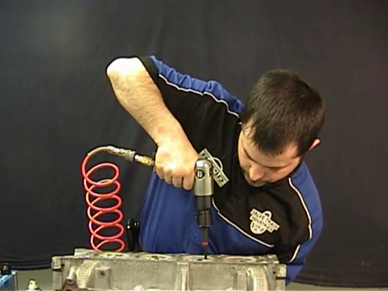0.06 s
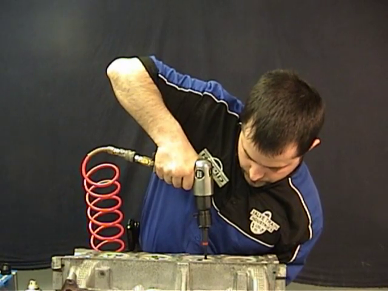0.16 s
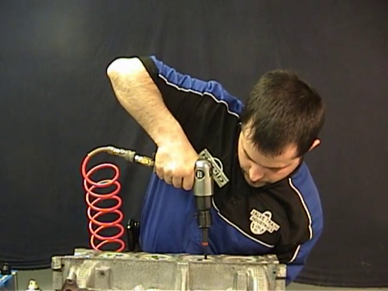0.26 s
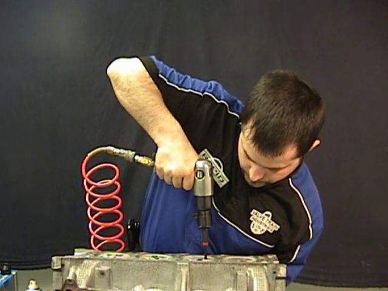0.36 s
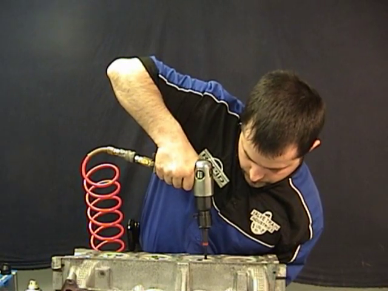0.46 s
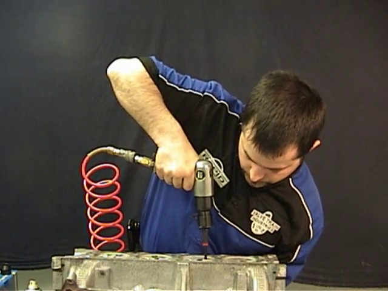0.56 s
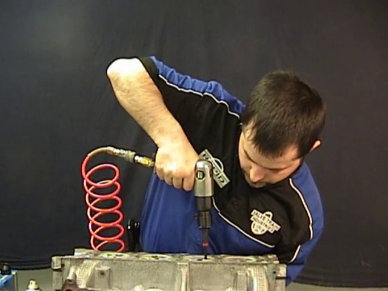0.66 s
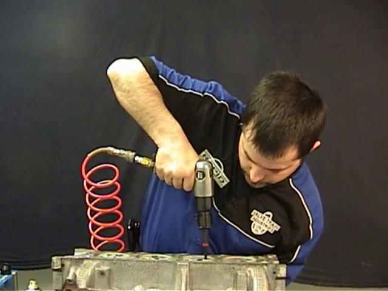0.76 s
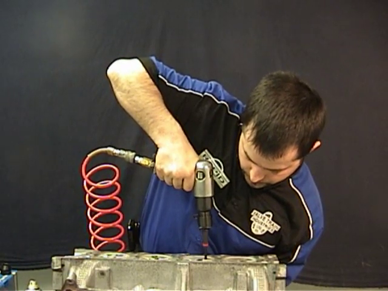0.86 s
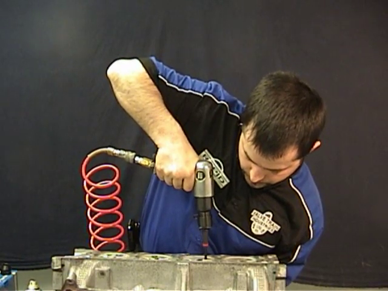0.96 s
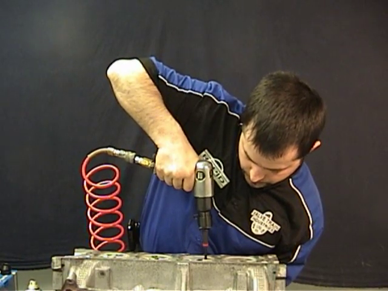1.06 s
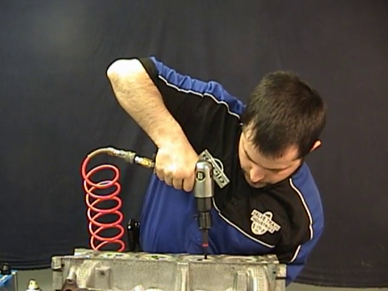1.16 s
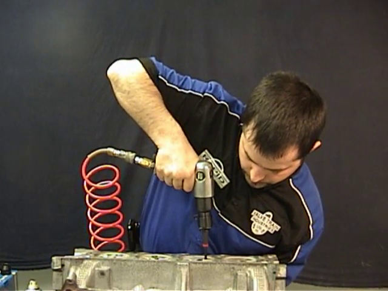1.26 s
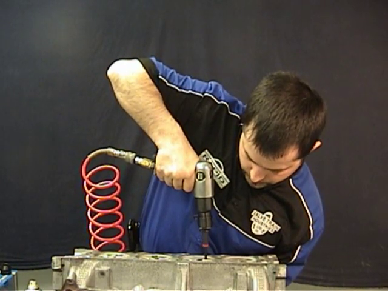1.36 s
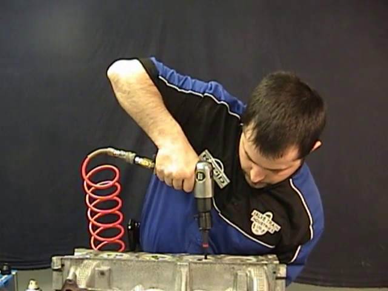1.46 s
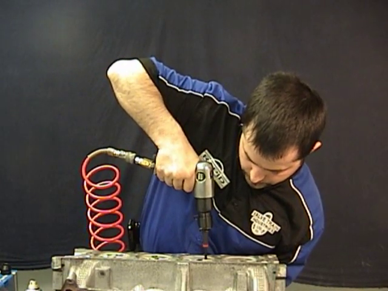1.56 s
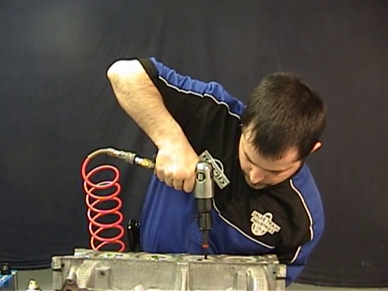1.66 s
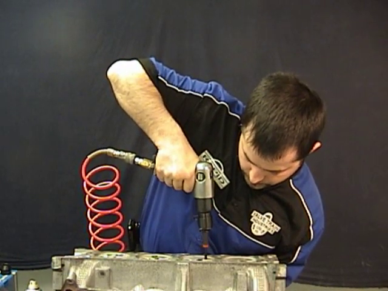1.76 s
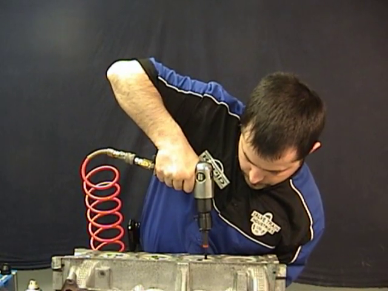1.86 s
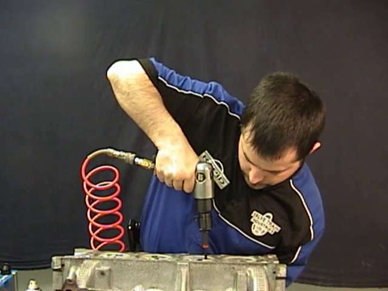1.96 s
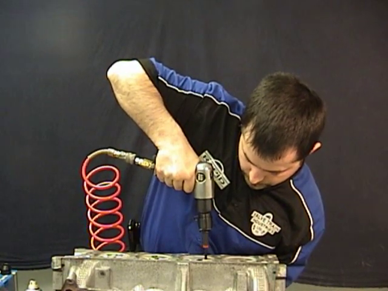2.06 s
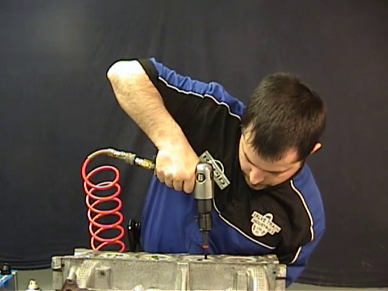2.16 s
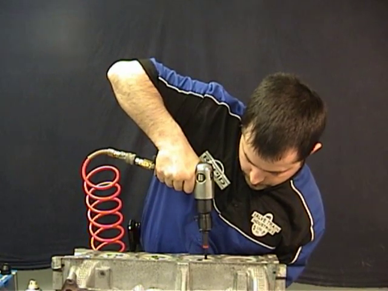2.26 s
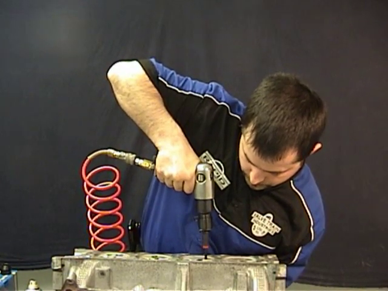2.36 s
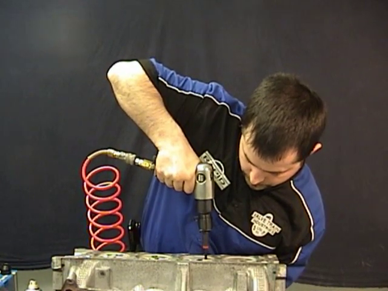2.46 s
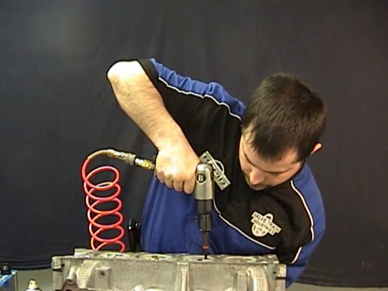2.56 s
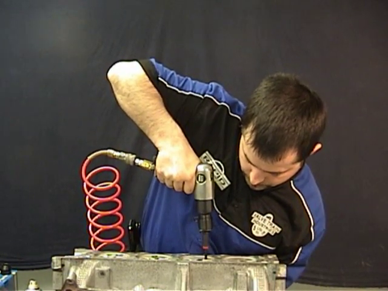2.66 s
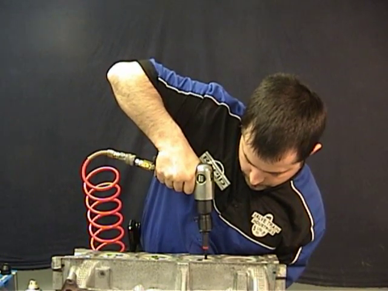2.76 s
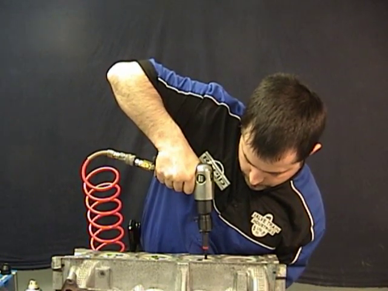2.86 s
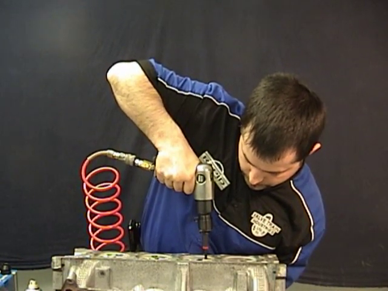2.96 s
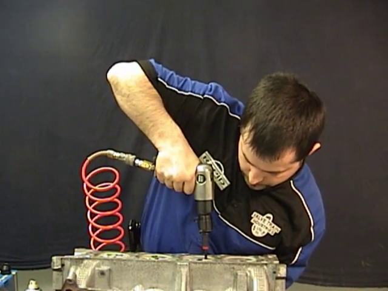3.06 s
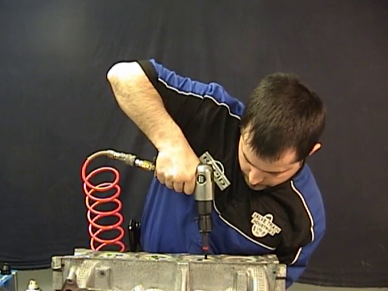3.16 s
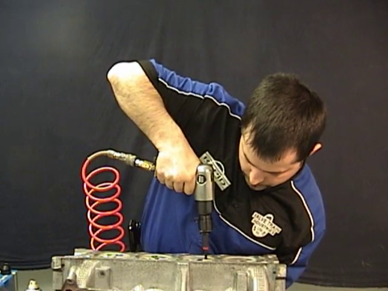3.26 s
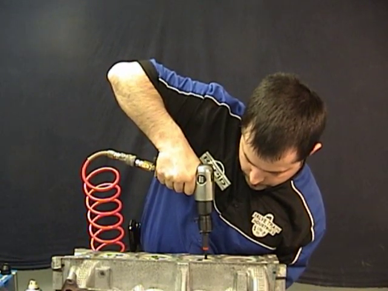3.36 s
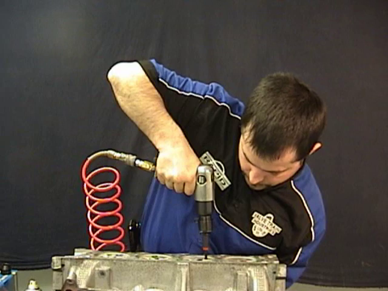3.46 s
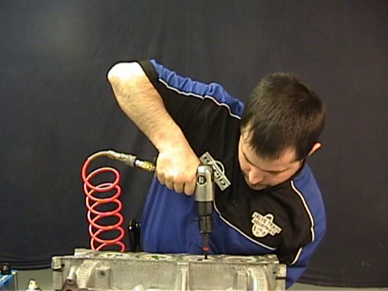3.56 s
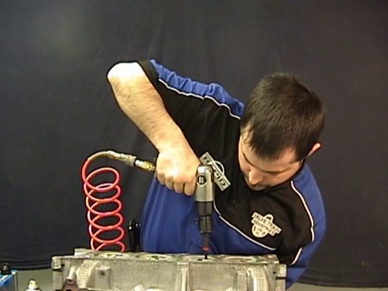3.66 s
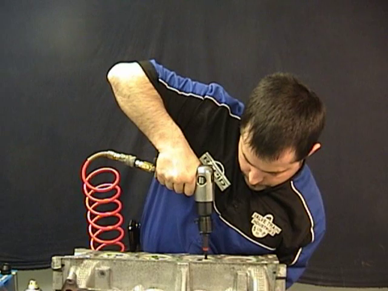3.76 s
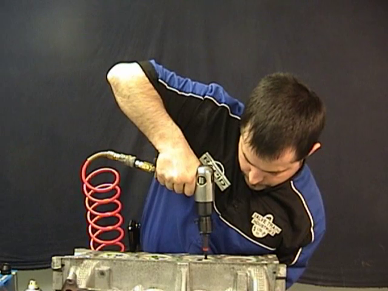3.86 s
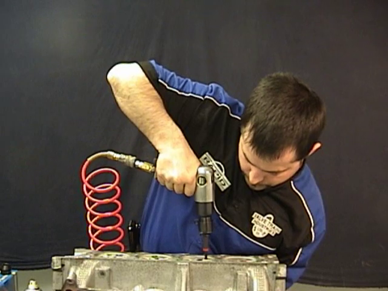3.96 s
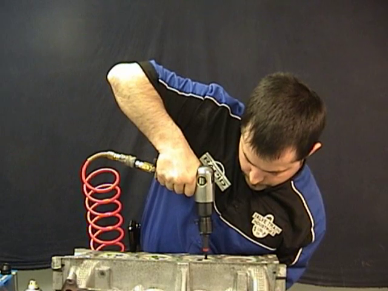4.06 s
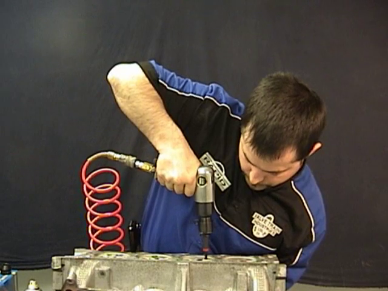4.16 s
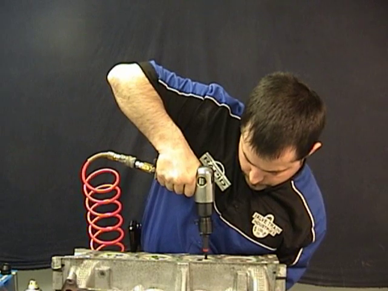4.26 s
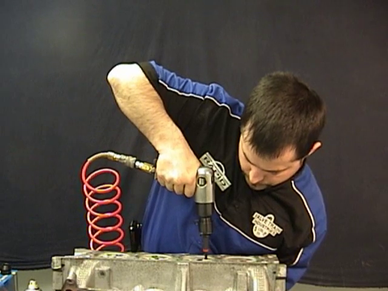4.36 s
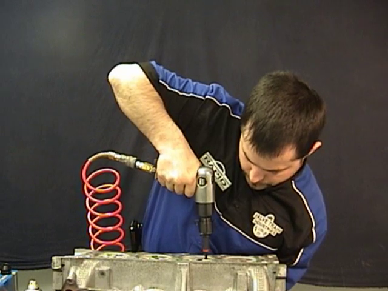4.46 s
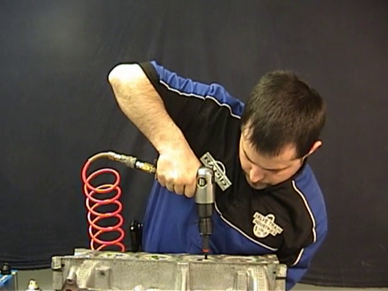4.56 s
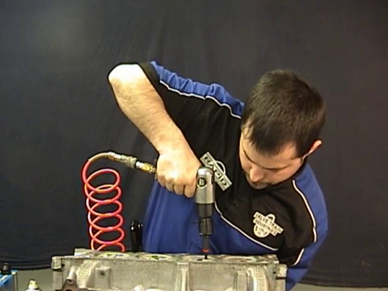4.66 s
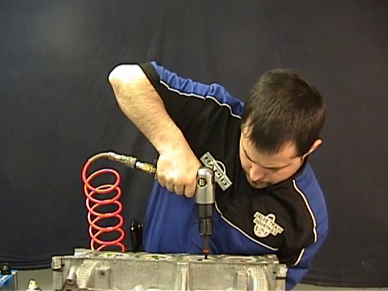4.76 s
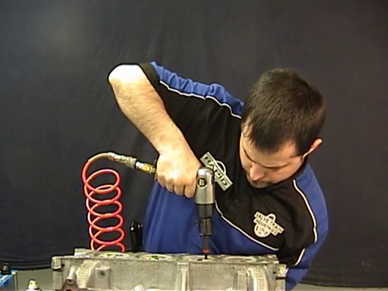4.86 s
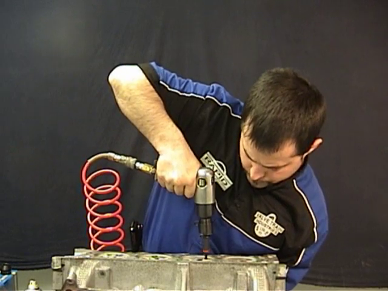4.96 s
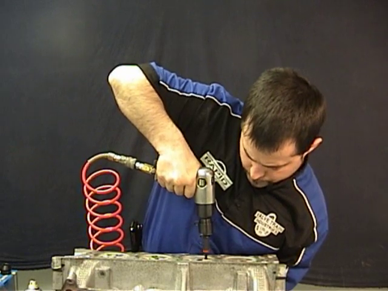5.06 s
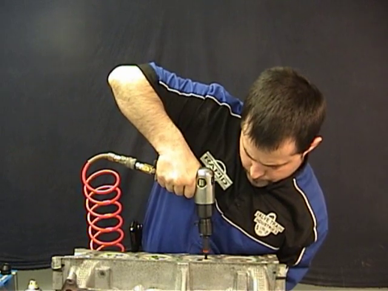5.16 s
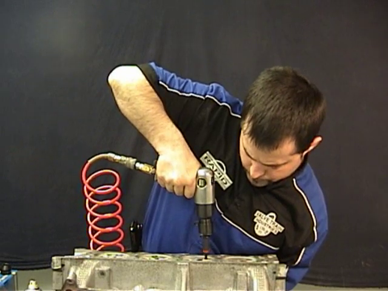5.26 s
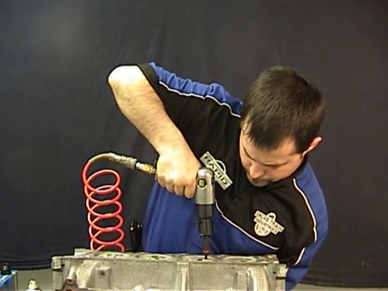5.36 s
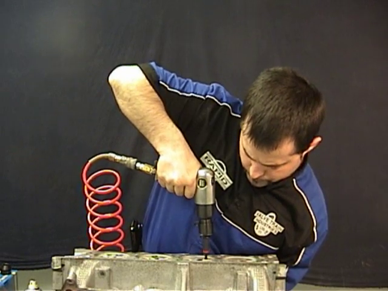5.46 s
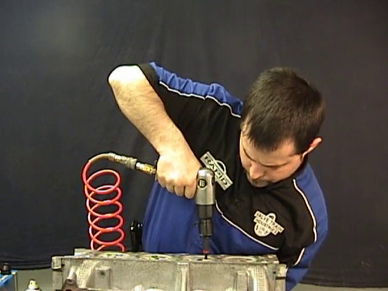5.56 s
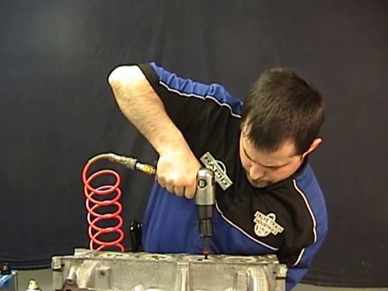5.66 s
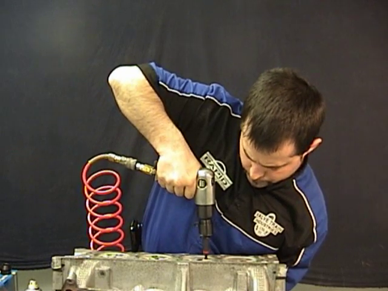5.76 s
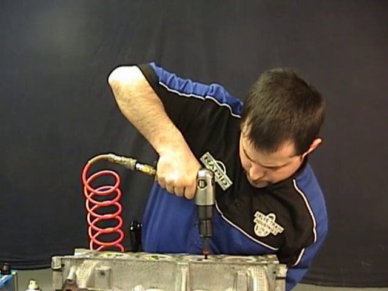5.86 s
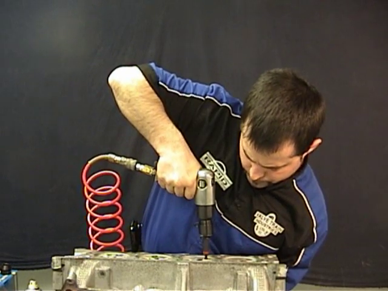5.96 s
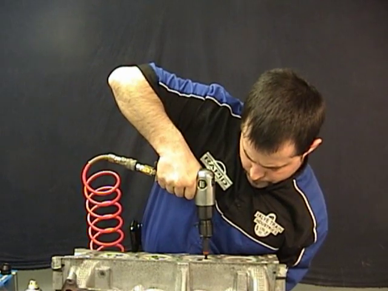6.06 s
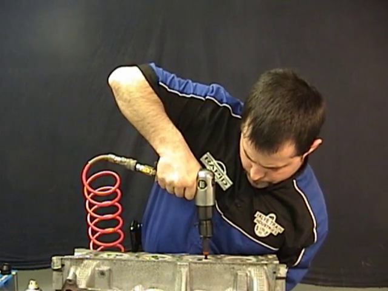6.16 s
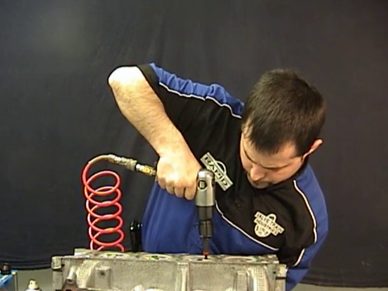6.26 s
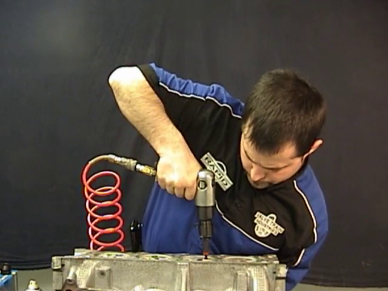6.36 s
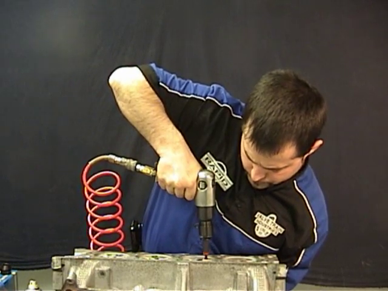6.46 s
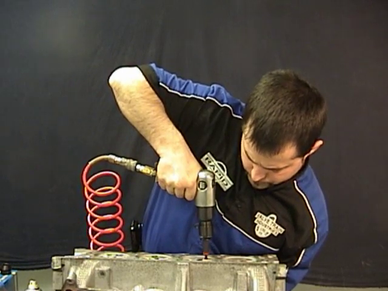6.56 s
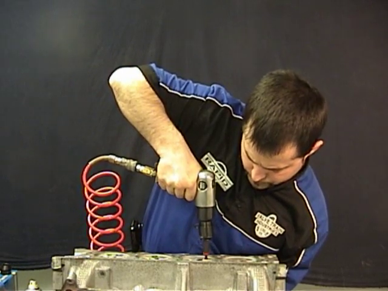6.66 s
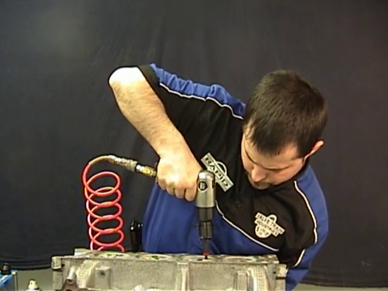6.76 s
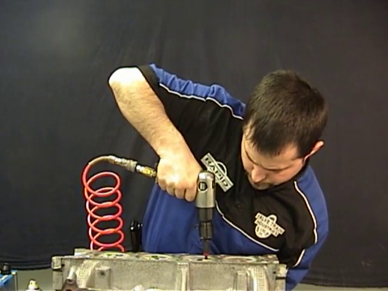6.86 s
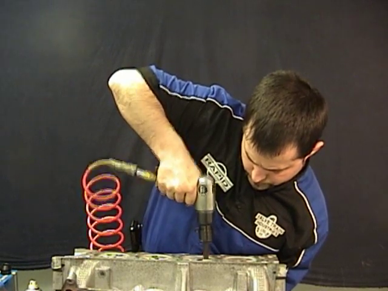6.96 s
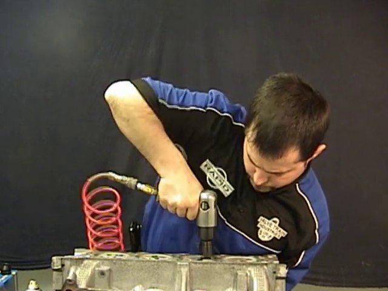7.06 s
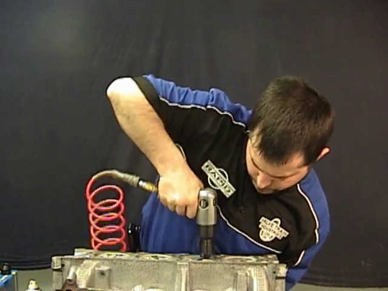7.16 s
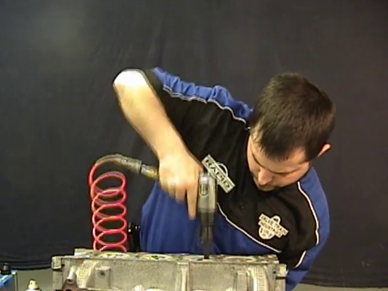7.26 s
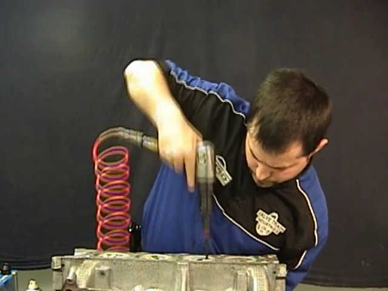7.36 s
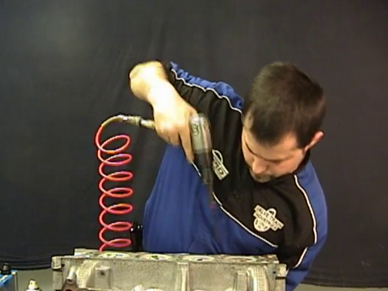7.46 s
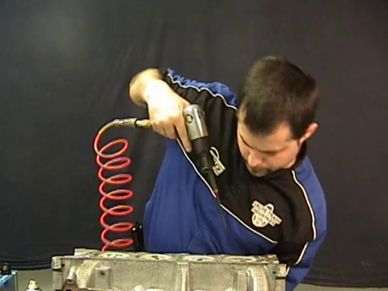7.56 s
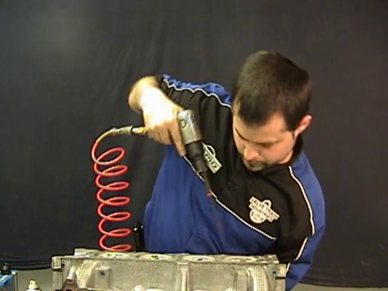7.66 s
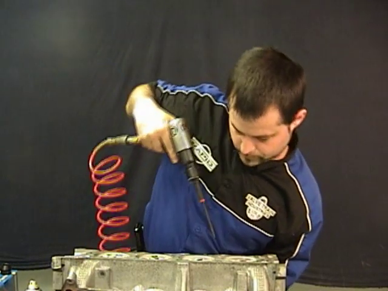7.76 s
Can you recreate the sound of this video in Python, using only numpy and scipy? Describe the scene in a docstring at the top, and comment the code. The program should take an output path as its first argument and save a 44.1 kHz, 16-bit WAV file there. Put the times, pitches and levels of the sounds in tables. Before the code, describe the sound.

Heard from nearby in a quiet workshop, a pneumatic chisel hammers a metal casting in one continuous burst. Low puffing exhaust, sharp hiss and ringing steel blend into an even rattle whose tone shifts slightly as the tool leans. Near the end the strokes weaken into a brief stutter and the trigger valve snaps shut. Small handling clicks and a soft fading ring remain.

```python
"""A small air hammer drives a chisel against a cast metal housing in a dry, quiet workshop.
From the start it strikes about 45 times a second. Each piston stroke gives a low puff of exhaust,
a burst of hiss and a steel blow that rings the chisel and the casting; the tone shifts as the tool leans.
At seven seconds the trigger is eased off: the piston slows, knocks loosely and stops.
The casting rings on while the tool is lifted with a few clicks."""
import sys
import numpy as np
from scipy import signal
from scipy.fft import rfft, irfft
from scipy.io import wavfile
from scipy.ndimage import uniform_filter1d

SR = 44100
rng = np.random.default_rng(int(sys.argv[2]) if len(sys.argv) > 2 else 0)


def store_pcm(level_fs):
    """Save levels as 16-bit WAV."""
    pcm = np.round(np.clip(level_fs, -1, 1) * 32767).astype(np.int16)
    wavfile.write(sys.argv[1], SR, np.atleast_2d(pcm).T)


N = 344852
TIME = np.arange(N) / SR

# piston speed under full air, sagging a little as the tool is leaned on: (time [s], rate [strokes/s])
STROKE_RATE = [(0.0, 45.68), (1.4, 45.12), (1.8, 45.42), (2.0, 45.0), (2.8, 45.17), (3.2, 44.98),
               (4.4, 45.14), (5.4, 44.31), (5.8, 44.79), (7.05, 44.75)]
# strength of the escaping air: (time [s], puff level [dB], hiss level [dB])
AIR_FLOW = [(0, -28.5, -32), (3.5, -28.5, -31.5), (4.5, -28.3, -32), (5.3, -27.5, -31.5), (6.2, -28, -32),
            (6.95, -28, -32), (7.06, -27.5, -33), (7.16, -29, -34), (7.2, -32, -37), (7.3, -32, -38)]
# how hard the piston hits the chisel: (time [s], level [dB])
BLOW_STRENGTH = [(0, -2.35), (3, -2), (4.6, -2.5), (6.85, -2), (6.97, -4.5), (7.05, -17), (7.13, -13.5),
                 (7.3, -20.5)]
# tilt of the chisel, which shifts what rings: (time [s], tilt [0 upright to 1 leaning])
TILT = [(0, 0), (1.5, 0), (2.6, 0.14), (3.4, 0.56), (4.3, 0.35), (4.9, 1), (6, 1), (7, 0.98)]
# slowing strokes as the air runs out: (time [s], force [dB])
FINAL_STROKES = [(7.0609, 2.5), (7.0854, -2), (7.1079, 1), (7.1327, -0.5), (7.155, 1), (7.179, -0.5),
                 (7.2078, 1.5), (7.2318, 1), (7.259, 0.5), (7.289, -0.5)]


def gain_of(db):
    """Turns decibels into a number to multiply a sound by."""
    return 10 ** (np.asarray(db) / 20)


def fade(t, t60):
    """A fade that falls by 60 dB in t60 seconds."""
    return gain_of(-60 * t / t60)


def evened(x):
    """Scales a signal so that its average size (rms) is 1."""
    return x / np.sqrt(np.mean(x ** 2) + 1e-20)


def at_pitch(points, hz):
    """Looks up a table at the frequencies hz, with octaves evenly spaced."""
    table_hz, value = np.transpose(points)
    return np.interp(np.log(hz + 1), np.log(table_hz), value)


def at_time(rows, t, column=1):
    """Looks up one column of a table at the times t."""
    rows = np.asarray(rows)
    return np.interp(t, rows[:, 0], rows[:, column])


def noise(colour):
    """Steady noise of average size 1, shaped by rows of (frequency [Hz], level [dB])."""
    gains = gain_of(at_pitch(colour, np.fft.rfftfreq(N, 1 / SR)))
    return evened(irfft(rfft(rng.standard_normal(N)) * gains, N))


def train(times, sizes):
    """One spike of the given size at each time."""
    return np.bincount(np.clip(np.round(times * SR), 0, N - 1).astype(int), sizes, N)


def repeat(shape, times, sizes):
    """Starts a copy of the shape at each time, scaled by its size."""
    return signal.oaconvolve(train(times, sizes), shape)[:N]


def pan(x, db):
    """Makes stereo with the left side db louder than the right."""
    return x * gain_of([[db / 2], [-db / 2]])


def cut_bass(x, edge_hz=900):
    """Small metal parts and narrow air ports give off almost no bass."""
    return signal.sosfilt(signal.butter(3, edge_hz, "high", fs=SR, output="sos"), x)


def drift(times, memory_s):
    """A random value for each stroke that stays close to the ones just before it."""
    carry = np.exp(-np.diff(times).mean() / memory_s)
    return evened(signal.lfilter([1], [1, -carry], rng.standard_normal(len(times))))


def piston_strokes(start_cycle=.13):
    """Times and forces of all strokes; the tool is already running at the start."""
    steady = TIME[TIME < STROKE_RATE[-1][0]]
    cycles = start_cycle + np.cumsum(at_time(STROKE_RATE, steady)) / SR
    times = np.r_[0, steady[1:][np.diff(np.floor(cycles)) > 0]]
    final_times, final_db = np.transpose(FINAL_STROKES)
    return np.r_[times, final_times], gain_of(np.r_[np.zeros(len(times)), final_db])


def puff(overtones, stroke_hz, size=4096):
    """One pulse of exhaust air, smeared in time by its different paths to the listener."""
    # higher tones build up late, so each puff rises in pitch: (frequency [Hz], delay [s])
    build_up = [(200, 0), (320, .0033), (450, .0015), (600, .0023), (800, .0035), (1000, .0076),
                (1300, .006), (2000, .004)]
    # the direct path and echoes off bench, walls and floor: (delay [ms], strength [factor])
    paths = [(0, 1), (3.4, .4), (8.8, .37), (11.9, .55)]
    hz = np.fft.rfftfreq(size, 1 / SR)
    tone = [(k * stroke_hz, db) for k, db in overtones]
    tone += [(1250, -10.5), (1750, -12.5), (2100, -29.5), (4000, -14.0), (9000, -67)]
    log_gain = np.log(gain_of(at_pitch(tone, hz)))
    mirrored = np.r_[log_gain, log_gain[-2:0:-1]]
    pulse = np.exp(np.conj(signal.hilbert(mirrored)))[:len(hz)]  # starts sharply, then dies away
    pulse *= np.exp(-2j * np.pi * np.cumsum(at_pitch(build_up, hz)) * hz[1])
    echoes = sum(gain * np.exp(-2j * np.pi * hz * ms / 1e3) for ms, gain in paths)
    return np.roll(irfft(pulse * echoes / (abs(echoes) + 0.0018)), size // 2)


def exhaust(times, force, gain_db=-.5, uneven_db=1.35, lead_s=.003):
    """Nearly identical puffs, one a stroke, run together into a low buzz."""
    # tone of a puff, tool upright and leaning: (overtone [multiple of the stroke rate], level [dB])
    upright_tone = [(1, -40), (2, -18), (3, -22), (4, -1.5), (5, -11.5), (6, -2), (7, 3), (8, -3.5),
                    (9, -19), (10, 1), (11, -6.5), (12, 2), (13, 0), (14, -11.5), (15, -12), (16, -7.5),
                    (17, -1), (18, 2.5), (19, 0.5), (20, 1.5), (21, -10), (22, 4), (23, -18.5), (24, -10.5)]
    leaning_tone = [(1, -36), (2, -16), (3, -21), (4, -1.5), (5, -14), (6, 2.5), (7, -8.5), (8, -1.5),
                    (9, -14.5), (10, 0.5), (11, -5.5), (12, 1.5), (13, 0), (14, -6.5), (15, -18), (16, -7),
                    (17, -17), (18, -4), (19, 2), (20, 0.5), (21, -2), (22, -7), (23, -6), (24, -15.5)]
    size = force * gain_of(at_time(AIR_FLOW, times) + uneven_db * rng.standard_normal(len(times)))
    tilt = at_time(TILT, times)
    # the valve opens just before the blow, a little unevenly
    times = times - lead_s + .0001 * rng.standard_normal(len(times))
    buzz = np.zeros(N)
    for shape, share in [(puff(upright_tone, 45.86), 1 - tilt), (puff(leaning_tone, 44.75), tilt)]:
        buzz += signal.oaconvolve(train(times, size * share), shape / np.linalg.norm(shape), "same")
    samples_per_stroke = SR / np.mean(at_time(STROKE_RATE, times))
    return pan(buzz, -0.54) * gain_of(gain_db) * np.sqrt(samples_per_stroke)


def air_hiss(times, force, gain_db=3, rise_s=.00011, delay_s=.0001, spread=.011):
    """Air leaves the port in a bright spit at each stroke, then drains more slowly."""
    # tone of the first spit and of the draining air: (frequency [Hz], level [dB])
    spit = [(200, -8), (1500, -29), (2200, -1.5), (3200, -19), (6000, 10), (7300, -6), (8400, 11),
            (10100, -7), (11700, 5), (13500, -3), (15700, 4)]
    drain = [(60, -39), (400, 21.5), (1100, -3.5), (1700, -1.5), (2200, -5), (2900, -26), (3800, 3.5),
             (5500, 1), (7000, 9), (8500, -6), (9900, -19), (11700, 4), (13500, 1), (15700, -60)]
    t = np.arange(SR // 5) / SR
    flow_db = gain_db + at_time(AIR_FLOW, times, column=2)
    samples_per_stroke = SR * np.diff(times).mean()
    out = np.zeros((2, N))
    for colour, t60, uneven_db in [(spit, .032, 1), (drain, .26, .5)]:
        power = ((1 - np.exp(-t / rise_s)) * fade(t, t60)) ** 2
        power *= samples_per_stroke / power.sum()
        size = force * gain_of(flow_db - uneven_db * rng.standard_normal(len(times)))
        flow = np.sqrt(abs(repeat(power, times + delay_s, size ** 2)))
        out += flow * (pan(noise(colour), 0.2) + spread * noise(colour) * np.array([[1], [-1]]))
    return out


def tone_swells(times, hz):
    """One ringing tone briefly swells louder and steadier: gives steadiness (0 to 1) and boost in dB."""
    # moments when a tone swells: (middle [s], half length [s], tone [Hz], boost [dB])
    swells = [(.17, .13, 3202, 2), (1.54, .05, 2961, 4), (1.72, .04, 2961, 3), (1.87, .04, 2961, 3),
              (2.77, .06, 2961, 4), (3.08, .09, 3202, 5), (3.45, .05, 2961, 4), (4.1, .06, 2961, 3),
              (4.39, .04, 2961, 3), (4.99, .08, 2961, 4), (5.0, .27, 1934, 10), (5.74, .05, 2961, 5),
              (6.21, .05, 2961, 4)]
    middle, half_length, tone_hz, boost_db = np.transpose(swells)
    shapes = np.exp(-((times[:, None] - middle) / half_length) ** 4) * (tone_hz == hz)
    return shapes.sum(1), shapes @ boost_db


def steel_ring(times, force, gain_db=2, delay_s=.0008, uneven_db=2.5, seat_db=4.5, sag_hz=14):
    """Blows push each tone of the metal roughly in step with its swing; uneven contact makes it waver."""
    # tones of chisel and casting:
    # (frequency [Hz], fade time [s], level upright [dB], half leaning [dB], leaning [dB])
    tones = [(1454, .2, -28, -29.5, -32), (1934, 1.2, -44.5, -44, -46), (2961, .23, -26.3, -27, -28.5),
             (2508, .27, -37, -39, -38), (3202, .36, -29, -31, -29), (3429, .45, -33, -39, -42),
             (3961, .4, -33, -38, -39), (4172, .24, -44, -46, -46), (4301, .25, -32, -36, -36),
             (4581, .37, -41, -41, -41), (5056, .18, -35, -33, -34), (5302, .16, -30.5, -28.5, -28.5),
             (5432, .18, -40, -40, -43), (5529, .24, -38, -38, -36), (6013, .3, -40, -32, -38),
             (6314, .3, -33, -34, -39), (6843, .25, -39, -38, -34), (7020, .25, -40, -38, -37),
             (7063, .2, -42, -41, -39), (7386, .2, -50, -48, -41), (8995, .15, -42, -42, -42),
             (9372, .15, -48, -44, -41), (9722, .11, -46, -43, -36), (10250, .15, -50, -48, -43),
             (10917, .3, -43, -38, -45), (14901, .15, -44, -47, -56)]
    # where the tones sit in stereo: (frequency [Hz], left over right [dB])
    sides = [(1450, -5), (1950, -6), (2960, 3), (3300, -0.5), (5300, -1.5), (6500, 1.5), (9700, 12.5),
             (11000, -2.5)]
    # extra level of the lowest tone: (time [s], level [dB])
    lowest_boost = [(0, -2), (1.1, -1), (2.4, 2.9), (3.3, -0.2), (4.6, 1.3), (6.6, 1.5), (6.95, -4.5),
                    (7.3, 6)]
    tilt, hits = at_time(TILT, times), times + delay_s
    out = np.zeros((2, N))
    for k, (hz, t60, *db_by_tilt) in enumerate(tones):
        steadiness, swell_db = tone_swells(times, hz)
        db = gain_db + np.interp(tilt, [0, .5, 1], db_by_tilt) + at_time(BLOW_STRENGTH, times) + swell_db
        cycles = hz * TIME
        if k == 0:
            db += at_time(lowest_boost, times)
            cycles -= sag_hz * np.cumsum(at_time(TILT, TIME)) / SR  # goes flat as the chisel leans
        uneven, jolt, slip = rng.standard_normal((len(times), 3)).T * (1 - steadiness)
        # the tip shifts in its seat, so each tone's level wanders by itself
        wander_db = seat_db * np.tanh(drift(times, memory_s=.035)) * (1 - steadiness)
        size = force * gain_of(db + wander_db + uneven_db * uneven)
        kicks = size * np.exp(1j * (jolt + .683 * np.cumsum(slip)))  # angle: how far out of step
        kicks[0] *= 1.7  # the metal is already ringing
        drive = train(hits, kicks.real) + 1j * train(hits, kicks.imag)
        drive = uniform_filter1d(drive, int(SR * 5 / hz) + 1)  # a blow takes five cycles to soak in
        swing = signal.lfilter([1], [1, -fade(1 / SR, t60)], drive + 1e-15)
        running_power = np.mean(abs(swing[TIME < times[-1]]) ** 2)
        swing *= np.sqrt(2 * np.mean(gain_of(db) ** 2) / running_power)
        ring = swing * np.exp(2j * np.pi * cycles)
        stereo_phase = np.exp(1j * rng.uniform(-0.056, 0.093) * np.array([[1], [-1]]))
        out += (pan(ring, at_pitch(sides, hz)) * stereo_phase).imag
    return cut_bass(out)


def casting_rattle(times, force, gain_db=-27, t60=.3, delay_s=.001, count=160):
    """Each blow stirs the casting's many weak tones, which blur into a metallic rattle."""
    # tone of the rattle: (frequency [Hz], level [dB])
    colour = [(2300, -10), (2900, 0.5), (4000, -7.5), (5600, -1), (7000, -7), (10000, -5.5), (15500, -22)]
    t = np.arange(SR // 4) / SR
    hz = rng.uniform(colour[0][0], colour[-1][0], (count, 1))
    phase = rng.uniform(0, 2 * np.pi, (count, 1))
    tones = gain_of(at_pitch(colour, hz)) * np.sin(2 * np.pi * hz * t + phase) * fade(t, t60)
    size = force * gain_of(at_time(BLOW_STRENGTH, times) + 2 * rng.standard_normal(len(times)))
    hits = times + delay_s + .0002 * rng.standard_normal(len(times))
    overlapping_blows = len(t) * STROKE_RATE[0][1] / SR
    ring = evened(tones.sum(0)) / np.sqrt(overlapping_blows)
    return pan(repeat(ring, hits, size), 0.16) * gain_of(gain_db)


def recoil(times, force, gain_db=-31, tilt_db=6, hz=440, t60=.019, rise_s=.0022, lead_s=.0018):
    """For a few strokes at a time the tool kicks back off its chisel with a dull knock."""
    t = np.arange(SR // 20) / SR
    knock = np.sin(2 * np.pi * hz * t) * (1 - np.exp(-t / rise_s)) * fade(t, t60)
    looseness = np.clip(drift(times, memory_s=.15) - .12, 0, 1)
    size = force * looseness * gain_of(gain_db + tilt_db * at_time(TILT, times))
    return cut_bass(repeat(knock / abs(knock).max(), times - lead_s, size), edge_hz=285)


def room_noise(air_db=-55, drone_hz=199, drone_db=-62):
    """Soft workshop noise with a faint low drone."""
    # tone of the quiet room: (frequency [Hz], level [dB])
    colour = [(18, -57), (30, -32), (160, 1.5), (197, -6), (479, -7.5), (808, -8), (1050, -16), (1910, -14),
              (2070, -23), (2910, -13), (3780, -19), (6720, -19.5), (15500, -30)]
    air = noise(colour) + .5 * np.array([noise(colour), noise(colour)])
    drone = evened(np.sin(2 * np.pi * drone_hz * TIME))
    return gain_of(air_db) * air + gain_of(drone_db) * drone


def room_echo(x, size=22050, gap_s=.008):
    """Many reflections blend into a short echo whose treble dies first."""
    # how long the echo takes to fall by 60 dB: (frequency [Hz], fade time [s])
    fade_times = [(150, 0.6), (500, 0.44), (2000, 0.45), (6000, 0.11), (15000, 0.062)]
    # stereo width of the echo: (frequency [Hz], width [left-right difference over shared part])
    widths = [(180, 0.13), (600, 1.02), (1200, 1.07), (4000, 0.59), (8500, 1.3), (12000, 0.042)]
    reflections = rng.standard_normal((2, size)) * (np.arange(size) > gap_s * SR)
    hz, t, (middle, side) = signal.stft(reflections, SR, nperseg=256)
    side = side * at_pitch(widths, hz)[:, None]
    bands = np.array([middle + side, middle - side]) * fade(t, at_pitch(fade_times, hz)[:, None])
    tail = signal.istft(bands, SR, nperseg=256)[1]
    return signal.fftconvolve(x.mean(0)[None], tail / np.linalg.norm(tail[0]), axes=1)[:, :N]


def loose_knocks(t60=.13, rise_s=.001):
    """With the air nearly shut off, the tool knocks loosely on its chisel and the valve whistles."""
    # two knocking bands and the whistle: (centre [Hz], width [Hz], level [dB])
    bands = [(333, 88, -33.5), (953, 94, -34.5), (5750, 690, -29.5)]
    times, force_db = np.transpose(FINAL_STROKES)
    t = np.arange(SR // 4) / SR
    loudness = repeat((1 - np.exp(-t / rise_s)) * fade(t, t60), times, gain_of(force_db))
    hz = np.geomspace(40, 18000, 400)
    out = np.zeros(N)
    for centre, width, db in bands:
        colour_db = -10 * np.log10(1 + (2 * (hz - centre) / width) ** 4)
        out += gain_of(db) * noise(np.c_[hz, colour_db])
    return loudness * out


def casting_ring_out(rise_s=.01):
    """Freed from the chisel's pressure, the casting rings on after the last stroke."""
    # tones of the free casting: (frequency [Hz], level [dB], fade time [s])
    tones = [(1430, -53, 1.4), (1940, -45.5, 1.2), (2680, -58, 3), (2980, -57, 3.4), (3429, -53, 1.2),
             (6400, -49, 0.9), (7795, -59, 1.9)]
    t = np.maximum(TIME - FINAL_STROKES[-1][0], 0)
    ring = sum(gain_of(db) * fade(t, t60) * np.sin(2 * np.pi * hz * t) for hz, db, t60 in tones)
    return (1 - np.exp(-t / rise_s)) * ring


def handling_clicks(gain_db=-6.5):
    """The trigger valve snaps shut and the chisel is lifted out of its seat."""
    # short bursts of noise: (time [s], level [dB], centre [Hz], width [octaves], fade time [s])
    clicks = [(7.2925, -11.5, 8700, 0.11, 0.015), (7.3838, -22, 7700, 1, 0.012),
              (7.4108, -32, 8500, .6, .02), (7.542, -43, 2790, 1, .08), (7.608, -40, 6600, .15, .03),
              (7.713, -45, 270, 0.3, 0.34)]
    hz = np.geomspace(40, 18000, 80)
    out = np.zeros(N)
    for start, db, centre, octaves, t60 in clicks:
        colour_db = -10 * np.log10(1 + (np.log2(hz / centre) / octaves * 2) ** 4)
        loudness = gain_of(db + gain_db) * fade(np.maximum(TIME - start, 0), t60) * (TIME >= start)
        out += loudness * noise(np.c_[hz, colour_db])
    return out


def scene():
    """Adds the hammer's low and bright sounds, their echoes, the ringing metal and the room noise."""
    times, force = piston_strokes()
    buzz = exhaust(times, force) + recoil(times, force)
    knocks = loose_knocks()
    bright = cut_bass(air_hiss(times, force) + casting_rattle(times, force)) + handling_clicks()
    low_echo = room_echo(gain_of(-15.5) * buzz + gain_of(-11) * knocks)
    bright_echo = gain_of(-3.5) * room_echo(bright)
    metal = steel_ring(times, force) + casting_ring_out()
    return buzz + knocks + bright + low_echo + bright_echo + metal + room_noise()


def record(dry):
    """Cuts the very highest treble, above 15750 Hz."""
    low_pass = signal.firwin(1023, 15750, window=("kaiser", 9), fs=SR)
    return signal.oaconvolve(dry, low_pass[None], "same")


dry = scene()
out = record(dry)
store_pcm(out)
```